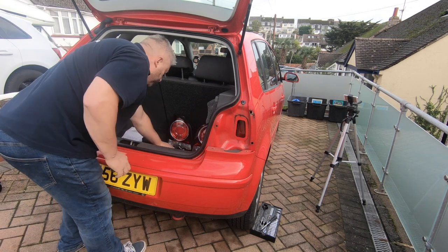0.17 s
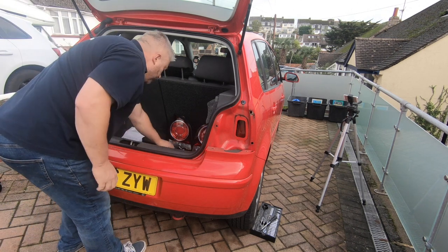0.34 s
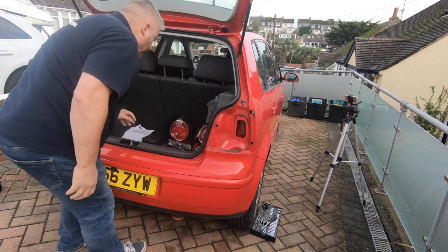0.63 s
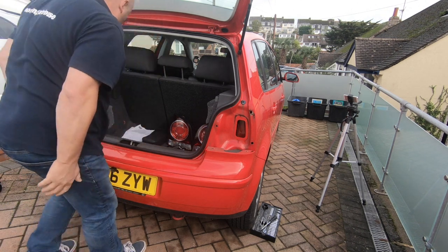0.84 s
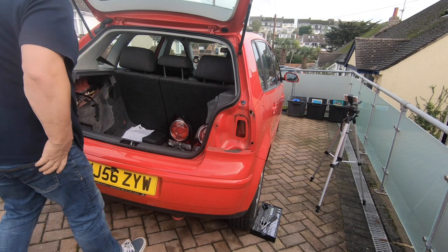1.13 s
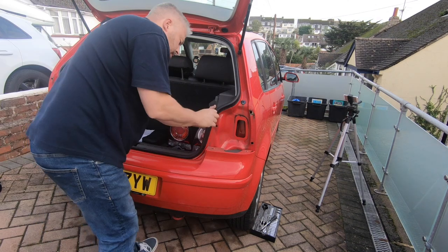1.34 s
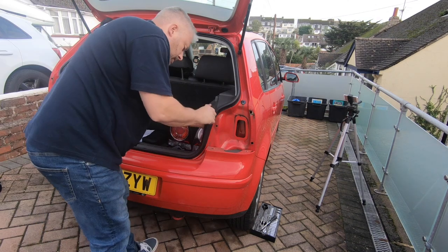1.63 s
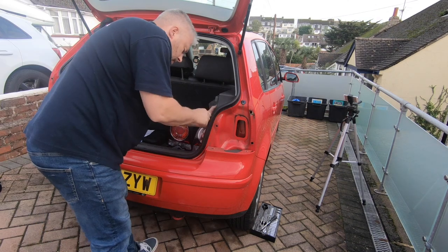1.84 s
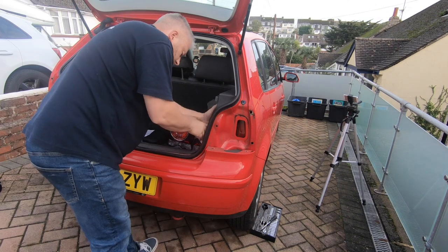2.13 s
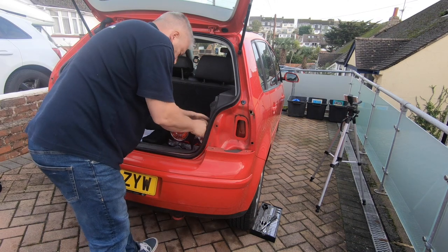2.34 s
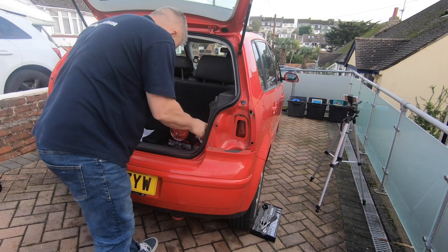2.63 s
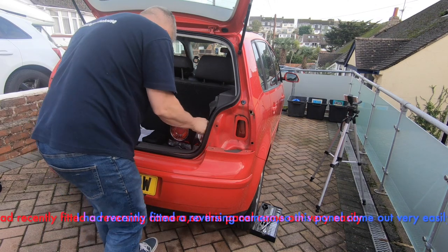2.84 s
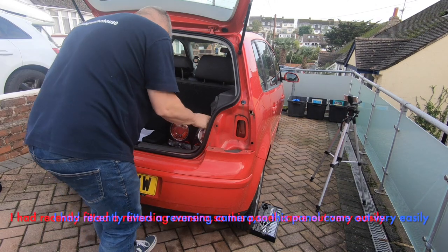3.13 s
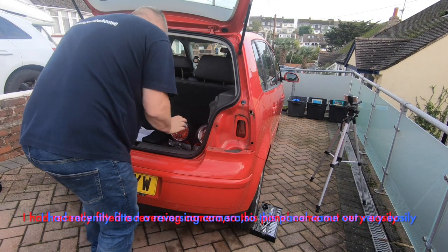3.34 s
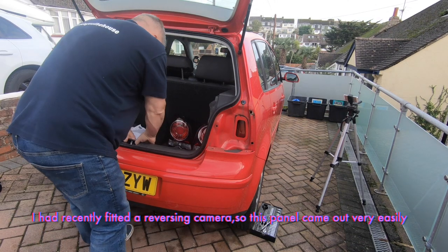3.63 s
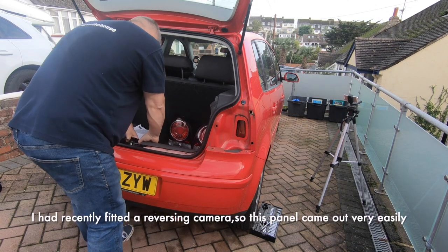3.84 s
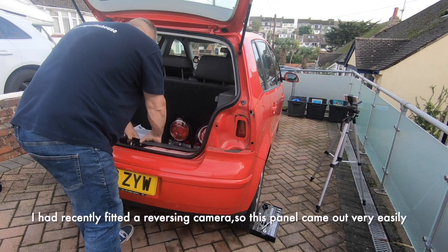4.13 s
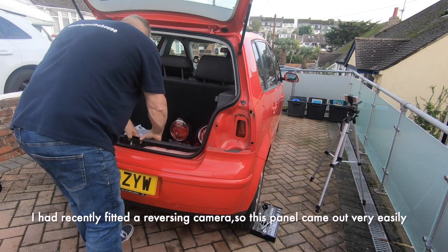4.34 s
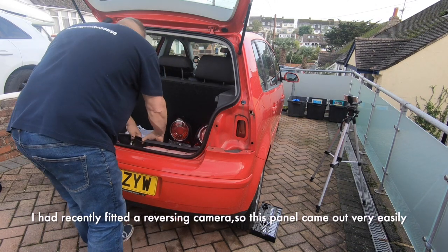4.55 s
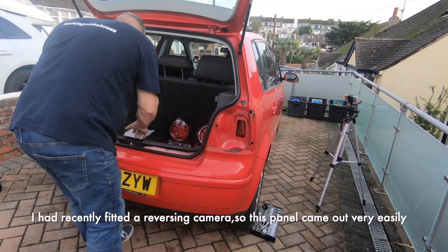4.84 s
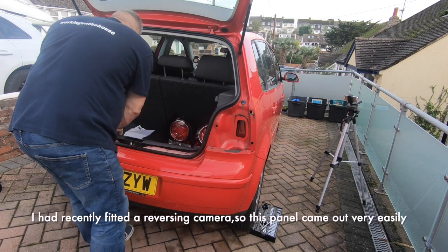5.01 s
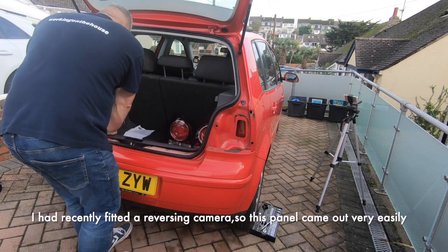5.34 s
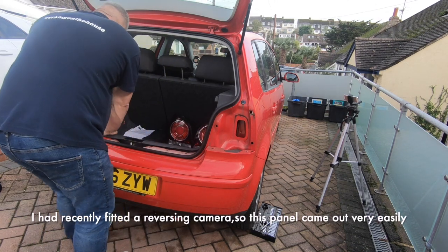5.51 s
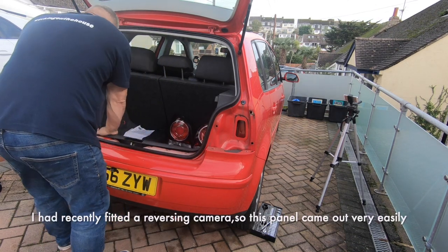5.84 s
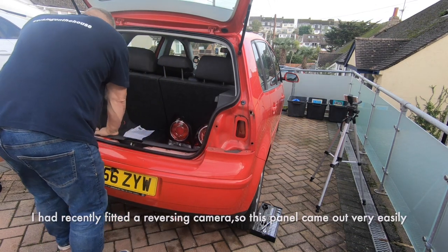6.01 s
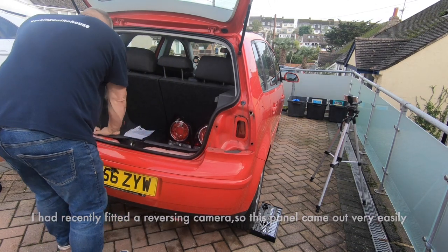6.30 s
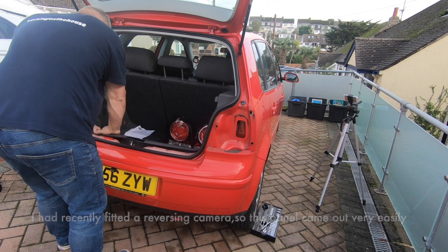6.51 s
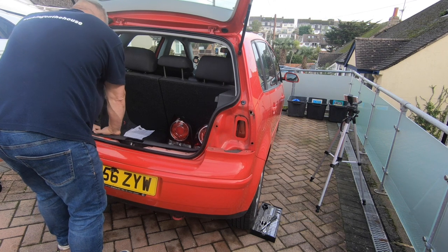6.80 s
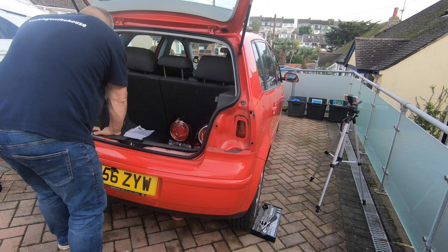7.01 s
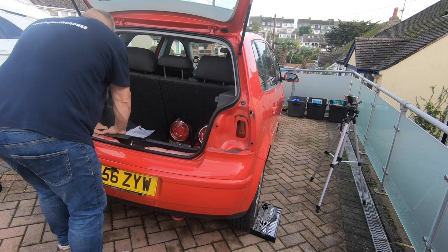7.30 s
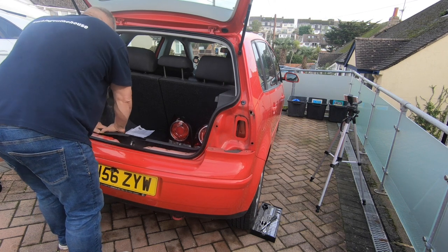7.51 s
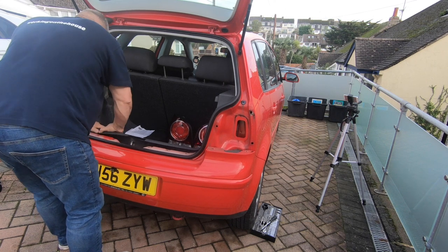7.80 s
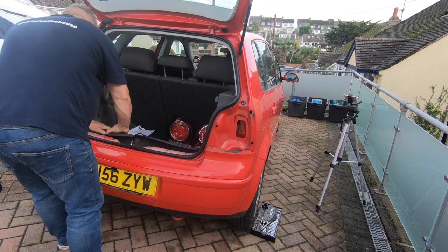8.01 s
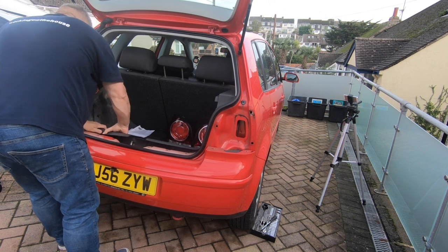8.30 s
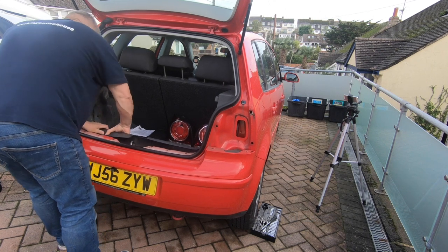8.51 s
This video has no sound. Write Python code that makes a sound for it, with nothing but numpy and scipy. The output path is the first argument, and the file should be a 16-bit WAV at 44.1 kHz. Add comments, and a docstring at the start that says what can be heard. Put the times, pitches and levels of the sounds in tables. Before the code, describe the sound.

A plastic panel is pried in the open boot of a car. Soft cloth rubbing leads to a short burst of snap and dull body thuds, then scattered scuffs and a resonant plastic knock. A lull gives way to the strongest clusters of crisp clip pops and boomy bumps, with one tiny bright tick between. The nearby stereo pickup is fairly dry, with distant town hum and gentle wind rumble.

```python
"""Trim panel worked loose in a car boot

A plastic trim panel is worked loose in the open boot of a parked car. Clips snap, plastic scuffs and
the panel bumps the hollow body: bursts of tiny contacts drive decaying modes and noisy knocks and cracks.
Hands and cloth rub in between, over town hum and light wind on the microphones: shaped, flickering noise.
Sparse reflections follow each hit, and wind puffs press the microphones as short low-pitched swings.
"""
import sys
import numpy as np
from scipy import signal
from scipy.fft import rfft, irfft
from scipy.io import wavfile
from scipy.ndimage import uniform_filter1d

SR = 44100
rng = np.random.default_rng(int(sys.argv[2]) if len(sys.argv) > 2 else 0)


def persist_wave(psi):
    """Save psi, clipped to +-1, as 16-bit WAV."""
    counts = np.round(np.clip(psi, -1, 1) * 32767).astype(np.int16)
    wavfile.write(sys.argv[1], SR, np.atleast_2d(counts).T)


N = 381906  # samples in the scene
SIZE = 12288  # samples in one hit
HZ = np.fft.rfftfreq(SIZE, 1 / SR)
LEAD = .004  # s of silence before each burst, room for the ports' phase lead


def gain_of(db):
    """Amplitude factor of a level in dB."""
    return 10 ** (np.asarray(db) / 20)


def evened(x):
    """Scales a signal to an RMS of one."""
    return x / np.sqrt(np.mean(x ** 2) + 1e-20)


def read(points, hz):
    """Reads a curve of (f, value) points along a logarithmic pitch axis."""
    f, value = np.transpose(points)
    return np.interp(np.log(hz + 1), np.log(f + 1), value)


def add(mix, s, sound):
    """Lays a sound into the mix from second s, cut at the end of the scene."""
    part = mix[..., round(s * SR):][..., :sound.shape[-1]]
    part += sound[..., :part.shape[-1]]


def causal(db):
    """Minimum-phase frequency response for a dB curve: nothing sounds before the blow."""
    log_gain = np.log(gain_of(np.maximum(db, -100)))
    circle = np.concatenate([log_gain, log_gain[-2:0:-1]])
    return np.exp(np.conj(signal.hilbert(circle)))[:len(db)]


def rings(modes, weights):
    """Frequency response of exponentially decaying modes, each with its weight."""
    t = np.arange(SIZE) / SR
    hz, db, t60 = np.transpose(modes)[:, :, None]
    decay = gain_of(db - 60 * t / np.clip(t60, .005, .25))
    return rfft(weights @ (decay * np.sin(2 * np.pi * hz * t)))


def burst(t60, rise, clumpy_db, first_db=-57.0, lumpy_db=0.):
    """Tiny uneven contacts in lumps, with a brief first blow, swell and die away; a twin has other signs."""
    t = np.arange(SIZE) / SR - LEAD
    sizes = gain_of(clumpy_db * np.minimum(rng.exponential(1, SIZE), 5)) * rng.choice([-1, 1], (2, SIZE))
    lumps = gain_of(lumpy_db * np.repeat(rng.standard_normal(SIZE // 96), 96))
    rattle = lumps * gain_of(-60 * t / np.clip(t60, .005, .4))
    first_blow = gain_of(first_db - 60 * np.maximum(t, 0) / 0.0087)
    swell = np.clip(t / rise, 0, 1) ** 2
    return rfft(swell * (rattle + first_blow) * sizes * (t < .2))


def ports(table, hz, first, second):
    """Spreads a spectrum over both ports; an unrelated twin makes up the share that is not alike."""
    db, phase, same = (read([(row[0], row[k]) for row in table], hz) for k in (1, 2, 3))
    port = gain_of(db / 2) * np.exp(.5j * phase)
    other = same * first + np.sqrt(1 - same ** 2) * second
    return np.array([port * first, other / port])


# The two microphone ports as heard from the boot:
# (f/Hz, left-right level/dB, left lead/rad, likeness 0-1)
NEAR_PORTS = [(100, -4, 0, 1), (250, -5.5, .2, 1), (450, -4.5, .8, .9), (680, -4, 1.7, .5),
              (1000, 0, 1.7, .9), (2000, 5, 1.2, .7), (2450, 6, 1, .4), (3000, 0, .2, .6),
              (4400, -3, .5, .8), (5200, -10, .8, .6), (6000, -11, 2, .25), (7000, -5, 3, .1),
              (8200, 2, 4, .15), (12000, 0, 6, .1)]


def peaked(spectra, db, span):
    """Sound at both ports, its envelope over span samples peaking at the given level."""
    x = irfft(ports(NEAR_PORTS, HZ, *spectra))
    peak = np.sqrt(2 * uniform_filter1d(x.mean(0) ** 2, span).max() + 1e-20)
    return gain_of(db) * x / peak


def wash(colour, curve_db, table, size, patchy_db, flicker_db):
    """Two-channel noise with drifting patches and a flicker shared by all frequencies."""
    hop = size // 4
    frames, hz = N // hop + 5, np.fft.rfftfreq(size, 1 / SR)
    a, b, c, d, patches = rng.standard_normal((5, frames, len(hz)))
    patches = evened(uniform_filter1d(uniform_filter1d(patches, 9, 0), 9, 1))
    flicker = evened(uniform_filter1d(rng.standard_normal(frames), 3))[:, None]
    level_db = read(colour, hz) + patchy_db * patches + flicker_db * flicker
    z = ports(table, hz, a + 1j * b, c + 1j * d) * gain_of(level_db)
    x = signal.istft(z, nperseg=size, noverlap=size - hop, time_axis=1, freq_axis=2)[1][:, :N]
    return gain_of(curve_db) * x / x.mean(0).std()


# The ports as heard from all around: (f/Hz, left-right level/dB, left lead/rad, likeness 0-1)
FAR_PORTS = [(60, -1, 0, .85), (150, -1, .4, .35), (300, -2, 1.5, .1), (450, 0, 3, .55),
             (750, -1, 3.1, .75), (1300, 0, 2.6, .5), (2450, 0, 1.9, .3), (3600, 0, .5, .55),
             (5200, -4, 0, .3), (6000, -6, .4, .1), (8000, 0, 0, 0)]
# Colour of the town hum: (f/Hz, relative level/dB per Hz)
TOWN_COLOUR = [(35, -37), (60, 1.5), (109, -12.5), (204, -5), (591, -22.5), (648, -15), (816, -10.5),
               (895, -18.5), (1670, -23), (3500, -40), (5950, -34.5), (8230, -39.5), (12500, -43.5),
               (14000, -47), (15000, -73)]


def town():
    """Steady broadband hum, strongest in the bass, that flickers slightly."""
    return wash(TOWN_COLOUR, -63, FAR_PORTS, size=1024, patchy_db=2.5, flicker_db=-1.2)


# Course of the wind: (t/s, level/dB)
WIND = [(0, -50), (.35, -59.5), (.6, -54.5), (1.2, -60.5), (1.5, -51), (1.85, -54), (2.0, -36),
        (2.32, -43.5), (2.42, -54), (2.58, -40.5), (3.0, -46), (3.15, -62), (3.55, -49.5), (4.1, -62),
        (4.6, -56.5), (5.5, -64.5), (6.4, -50), (7.25, -56), (7.85, -62.5), (8.66, -38.5)]
# Colour of the wind, nearly all bass: (f/Hz, relative level/dB per Hz)
GUST_COLOUR = [(7.1, -36), (12, -12), (32, 18.5), (52, 1.5), (113, -12), (223, -11), (260, -31.5),
               (340, -41), (570, -120)]


def wind(t):
    """Light wind on the microphones: a low rumble of noise that swells and sinks."""
    level_db = np.interp(t, *np.transpose(WIND))
    return wash(GUST_COLOUR, level_db, FAR_PORTS, size=2048, patchy_db=3.0, flicker_db=1.8)


# Rubbing of hands and cloth: (t/s, rustle level/dB, low shuffle level/dB)
RUB = [(0, -75.5, -63), (.65, -73.5, -59.5), (1.08, -68, -68), (1.4, -69.5, -56.5), (2.05, -65.5, -55),
       (2.77, -69, -64.5), (3.0, -65.5, -57.5), (3.4, -66.5, -53.5), (3.85, -65.5, -54),
       (4.08, -68.5, -56.5), (4.3, -63.5, -50.5), (4.7, -69, -53), (4.85, -72, -88), (5.05, -70, -65.5),
       (6.3, -65, -57.5), (7.5, -68.5, -60.5), (7.85, -72.5, -53.5), (8.66, -69, -87)]
# Colour of the rustle: (f/Hz, relative level/dB per Hz)
RUSTLE_COLOUR = [(410, -60), (700, 10.5), (1310, 9), (1720, 5), (3800, -9.5), (4210, -10.5), (6040, -7),
                 (7900, -21.5), (13500, -31), (15000, -37)]
# Colour of the low shuffle: (f/Hz, relative level/dB per Hz)
SHUFFLE_COLOUR = [(59, -51), (100, -24), (166, 1), (237, -12.5), (297, -16.5), (334, -16.5), (600, -31.5),
                  (780, -79), (1320, -120)]


def rubbing(t):
    """Friction of hands and cloth: a rustle of noise over a low shuffle, each with its own course."""
    s, rustle_db, shuffle_db = np.transpose(RUB)
    rustle = wash(RUSTLE_COLOUR, np.interp(t, s, rustle_db), FAR_PORTS,
                  size=256, patchy_db=0.5, flicker_db=-1.5)
    shuffle = wash(SHUFFLE_COLOUR, np.interp(t, s, shuffle_db), NEAR_PORTS,
                   size=1024, patchy_db=2.5, flicker_db=0.0)
    return rustle + shuffle


# Bright swishes of clothing: (t/s of the crest, level/dB, rise/s, fade/s)
SWISHES = [(.96, -67.5, 0.087, 0.28), (2.2, -73, 0.26, 0.32)]
# Colour of a swish: (f/Hz, relative level/dB per Hz)
SWISH_COLOUR = [(1760, -34), (3000, -3.5), (4370, -7), (6030, 2.5), (7960, -10.5), (9890, -10.5),
                (14500, -34)]


def swishes(t):
    """Cloth sweeps past cloth: a thin hiss swells and fades."""
    swell = 0
    for s, db, rise, fade in SWISHES:
        swell = swell + gain_of(db) * np.exp(-np.where(t < s, ((t - s) / rise) ** 2, (t - s) / fade))
    return swell * wash(SWISH_COLOUR, 0, FAR_PORTS, size=256, patchy_db=1.5, flicker_db=-0.5)


# Bumps on the body: (t/s of the full push, level/dB, strongest f/Hz, push t60/s, held to 0.4 at most)
BUMPS = [(0.921, -47, 177, 0.47), (1.047, -45.5, 169, 0.29), (1.374, -42, 71, 0.084),
         (1.507, -34, 221, 0.37), (1.531, -27.5, 118.4, 0.11), (1.564, -45, 64.6, 0.06),
         (1.857, -38.5, 252, 0.08), (1.867, -37, 156, 0.23), (1.899, -25, 91, 0.07),
         (1.988, -34.5, 67, 0.23), (2.07, -35, 53.7, 0.44), (2.199, -40, 54, 0.46),
         (2.491, -34.5, 145, 0.064), (3.212, -40, 184, 0.12), (3.238, -40.5, 188, 0.18),
         (3.602, -34.5, 263, 0.064), (3.658, -44.5, 356, 0.18), (3.752, -33, 122, 0.11),
         (3.772, -27, 148.6, 0.048), (3.79, -42, 127, 0.13), (3.809, -33.5, 183, 0.076),
         (4.189, -34.5, 209, 0.33), (4.312, -37, 258, 0.045), (4.384, -30, 201, 0.3),
         (4.428, -30, 100, 0.063), (4.61, -50, 310, 0.16), (4.698, -49.5, 230, 0.36),
         (4.745, -55, 330, 0.076), (5.166, -46, 171, 0.53), (6.259, -29, 203, 0.076),
         (6.268, -31.5, 198, 0.07), (6.28, -24.5, 99.4, 0.15), (6.496, -18.5, 185, 0.075),
         (6.506, -19.5, 193, 0.055), (6.52, -18.5, 170, 0.034), (6.541, -29, 120, 0.19),
         (6.556, -26.5, 163, 0.19), (6.576, -33.5, 82, 0.13), (6.68, -41, 184, 0.061),
         (7.113, -27, 194, 0.1), (7.125, -24, 165, 0.084), (7.147, -20, 90.5, 0.19), (7.16, -24, 201, 0.11),
         (7.176, -29, 99, 0.16), (7.198, -26.5, 210, 0.05), (7.207, -26, 70, 0.091),
         (7.502, -46.5, 188, 0.17), (7.68, -30, 171, 0.085), (7.696, -19.5, 120, 0.064),
         (7.722, -34, 270, 0.073), (7.719, -24, 119, 0.12), (7.874, -33.5, 161, 0.18),
         (8.034, -43.5, 147, 0.22), (8.231, -44, 169, 0.2), (8.414, -32, 109, 0.19),
         (8.606, -37, 78, 0.067)]
# Modes of the hollow body: (f/Hz, relative level/dB, t60/s)
BODY = [(54.7, -8, 0.13), (74.4, -8, 0.18), (88.9, -4, 0.19), (126, -3, 0.089), (151.4, -7, 0.053),
        (169, 1, 0.075), (213, 1.5, 0.074), (286.7, 4, 0.13), (334, -2, 0.11), (413, 4, 0.16),
        (474, -21, 0.064)]


def bumps(rise):
    """A soft push drives the hollow body; modes near the bump's pitch answer most."""
    out, body_hz = np.zeros((2, N)), np.transpose(BODY)[0]
    for s, db, hz, t60 in BUMPS:
        soft = causal(-9. * np.log2(np.maximum(HZ / (3.3 * hz), 1)))  # a soft push has little treble
        octaves = np.log2(body_hz / hz)
        near_db = np.minimum(20.2 * octaves, -30. * octaves)  # modes above the pitch fall off faster
        near = gain_of(near_db) * rng.choice([-1, 1], len(BODY))
        push = burst(t60, rise, clumpy_db=2.0, first_db=12.5)
        add(out, s - LEAD - rise, peaked(push * soft * rings(BODY, near), db, span=600))
    return out


# Modes of the plastic panel: (f/Hz, relative level/dB, t60/s)
PANEL = [(480, -7, .05), (567, -9, .06), (660, -10, .05), (776, 0, .035), (1043, -11, .046),
         (1223, -2, .05), (1417, -14, .05), (1576, -8, .06), (1819, -9, .045), (1925, -7, .04),
         (2043, -9, .04), (2170, -13, .04), (2300, -14, .04), (2420, -16, .04), (2700, -20, .03),
         (3300, -17, .03), (3700, -21, .025), (4250, -20, .025)]
# Where the panel is held and struck: (from t/s, relative ring level/dB, two favoured pitches f/Hz, f/Hz)
SPOTS = [(0, -6, 1043, 2420), (3., 0, 1223, 2060), (4.05, 10, 1223, 1240), (4.15, 2.5, 1043, 1660),
         (4.35, 1, 776, 2230), (4.9, -8, 776, 1925), (6.45, 2.5, 776, 1900), (7., -1.5, 720, 2060),
         (7.6, -2, 1223, 1880)]
# Colour of the dry knock: (f/Hz, relative level/dB per Hz)
KNOCK_COLOUR = [(210, -16), (350, 7), (559, -1.5), (780, 0.5), (960, -1.5), (1250, -2), (1500, -3.5),
                (1990, -6), (2860, -18), (4200, -23.5), (5460, -43.5), (9240, -120)]
# Colour of the crack: (f/Hz, relative level/dB per Hz)
CRACK_COLOUR = [(1650, -27.5), (2700, -8), (3270, -2.5), (3930, -3), (5650, 3), (7210, -5), (9000, -8.5),
                (9980, -7.5), (14100, -31), (16400, -42)]
FAVOUR_DB, FAVOUR_OCTAVES = 6.5, 0.23  # lift of the modes near a spot's pitches, and its reach
SPOT_DB = 2.2  # chance change of the modes from blow to blow
BANDS_DB = 4  # each crack has its own uneven bands, a few hundred Hz wide
CRACK_TILT_DB = 0.5  # dB per octave at a crack level of -56.5 dB
HARDER_BRIGHTER = 0.15  # growth of that tilt per dB of crack level


def panel_body(s, tilt_db, knock):
    """The panel's modes, as the spot held at second s favours them, ring over a dry knock."""
    _, ring_db, *pitches = [row for row in SPOTS if row[0] <= s][-1]
    octaves = np.log2(np.transpose(PANEL)[0][:, None] / pitches) / FAVOUR_OCTAVES
    favour_db = ring_db + FAVOUR_DB * np.exp(-octaves ** 2).max(1)
    chance_db = SPOT_DB * rng.standard_normal(len(PANEL))
    spot = gain_of(favour_db + chance_db) * rng.choice([-1, 1], len(PANEL))
    tilt = causal(tilt_db * np.log2(np.clip(HZ, 300, 3500) / 1200))
    return (knock + gain_of(-42.0) * rings(PANEL, spot)) * tilt


def crack_edge(crack_db, crack):
    """The bright edge of a blow, brighter when harder."""
    tilt_db = CRACK_TILT_DB + HARDER_BRIGHTER * (crack_db + 56.5)
    bands_db = BANDS_DB * np.interp(HZ, np.arange(0, 22400, 400), rng.standard_normal(56))
    return crack * causal(bands_db + tilt_db * np.log2(np.clip(HZ, 2500, 16000) / 6000))


def panel(events, rise_s, swell, **contact):
    """Each burst of contacts drives both the panel's body and its crack, each at its own level."""
    out = np.zeros((2, N))
    knock, crack = causal(read(KNOCK_COLOUR, HZ)), causal(read(CRACK_COLOUR, HZ))
    for s, panel_db, crack_db, t60, tilt_db in events:
        body, edge = panel_body(s, tilt_db, knock), crack_edge(crack_db, crack)
        rise = rise_s + swell * t60
        contacts = burst(t60, rise, **contact)
        hit = peaked(contacts * body, panel_db, span=120) + peaked(contacts * edge, crack_db, span=120)
        add(out, s - LEAD - .5 * rise, hit)
    return out


# Sharp snaps of clips: (t/s of mid-rise, panel level/dB, crack level/dB,
# rattle t60/s, held to 0.4 at most, panel tilt/dB per octave)
SNAPS = [(.924, -50, -76, 0.045, -5.5), (1.499, -36.5, -52, 0.047, 0.5), (1.505, -33, -41.5, 0.033, 4),
         (1.511, -34, -44, 0.12, -2), (3.143, -49.5, -66, 0.19, -1.5), (3.2015, -43.5, -55, 0.069, -2),
         (3.624, -53, -68, .05, 12), (3.664, -50.5, -73, 0.077, 12), (3.752, -45, -54, 0.12, 7),
         (3.767, -40, -51.5, 0.068, 7.5), (3.773, -40.5, -53.5, 0.11, 2), (4.183, -35.5, -61.5, 0.079, -5),
         (4.378, -28, -47, 0.066, 0), (4.387, -23.5, -54, 0.076, -6.5), (4.394, -41.5, -51.5, 0.24, -3),
         (4.705, -48, -82, 0.092, -5.5), (5.172, -47, -55, 0.074, -6), (5.216, -53, -71, 0.038, 0),
         (6.254, -43.5, -49.5, 0.042, -4), (6.26, -33, -72, 0.072, -5.5), (6.4905, -27.5, -60, 0.044, 3),
         (6.4935, -23.5, -41.5, 0.031, 3.5), (6.502, -26, -43.5, 0.059, 1), (6.51, -32, -47, 0.051, 5),
         (6.5165, -26.5, -33.5, 0.047, 3.5), (6.525, -28.5, -39.5, 0.053, -1.5),
         (6.537, -35.5, -42, 0.1, -1.5), (6.673, -45, -60, 0.07, 2), (7.11, -44, -42, 0.1, -7),
         (7.12, -29, -38, 0.039, 1.5), (7.1235, -28, -40, 0.045, 3.5), (7.131, -29.5, -40, 0.086, -3.5),
         (7.1462, -23, -28.5, 0.017, 4), (7.151, -34, -28.5, 0.027, 9), (7.158, -34, -38, 0.05, -0.5),
         (7.182, -44, -46, .05, 3), (7.176, -34, -46, 0.061, -2), (7.502, -57, -59, 0.15, 4),
         (7.679, -41.5, -57, 0.48, -1.5), (7.706, -41, -33.5, 0.043, -0.5), (7.709, -33, -31.5, 0.035, 1.5),
         (7.717, -43, -38, 0.076, -1.5), (7.733, -52, -43, 0.092, -2)]


def snaps():
    """Clips let go: a sharp blow and a short rattle strike the panel."""
    return panel(SNAPS, rise_s=.0008, swell=0, clumpy_db=3.0, first_db=-10.5, lumpy_db=1.5)


# How fast the reflections die in each band: (f/Hz, t60/s)
BOOT = [(100, 0.37), (500, 0.34), (2000, 0.19), (6000, 0.32), (14000, 0.25)]


def boot(x):
    """Sparse reflections of random sign from boot, car and walls, each band dying at its own speed."""
    taps = np.zeros((2, SR // 2))
    at = np.arange(160, SR // 2 - 20, 20) + rng.integers(0, 20, (2, (SR // 2 - 161) // 20))
    np.put_along_axis(taps, at, rng.choice([-1., 1.], at.shape), 1)
    hz, t, z = signal.stft(taps, SR, nperseg=256)
    decay = gain_of(-60 * t / np.maximum(read(BOOT, hz), .02)[:, None])
    tail = signal.istft(z * decay, SR, nperseg=256)[1]
    return signal.fftconvolve(x, tail / np.linalg.norm(tail[0]), axes=1)[:, :N]


# Single puffs of wind, each starting 10 ms before t: (t/s, level/dB before a small chance change, f/Hz)
BUFFETS = [(1.302, -43, 45.5), (1.787, -41.5, 33.4), (2.019, -47, 24), (2.492, -33, 63.4), (2.541, -30, 85),
           (2.604, -35, 40), (2.677, -45, 44.4), (2.952, -38.5, 21.5), (3.5, -37, 25.4), (4.406, -43, 24.6),
           (5.083, -37.5, 27.2), (6.254, -33, 69), (6.587, -40, 71.5), (6.773, -42, 27.4),
           (7.299, -44, 22.1), (7.676, -56, 70), (7.798, -35, 21.8), (8.139, -35.5, 22.3),
           (8.189, -37.5, 26.8), (8.39, -45, 29.6), (8.577, -53, 31)]


def buffets(turns):
    """A puff presses both microphones for a cycle or two."""
    out = np.zeros((2, N))
    for s, db, hz in BUFFETS:
        u = np.arange(0, turns, hz / SR)  # cycles since the puff began
        phase = rng.random() + 0.075 * rng.standard_normal((2, 1))
        puff = np.sin(np.pi * u / turns) ** 2 * np.cos(2 * np.pi * (u + phase))
        add(out, max(s - .01, 0), gain_of(db + 0.62 * rng.standard_normal((2, 1))) * puff)
    return out


# Soft scuffs: (t/s of mid-rise, panel level/dB, crack level/dB, rattle t60/s, held to 0.4 at most)
SCUFFS = [(1.539, -50, -65, 0.28), (1.835, -46.5, -54.5, 0.26), (1.853, -42.5, -59, 0.15),
          (1.882, -54, -62.5, 0.08), (2.863, -53, -63, 0.12), (3.172, -50, -56.5, 0.15),
          (3.59, -47, -60, 0.14), (3.622, -49, -59.5, 0.29), (3.642, -56, -74, 0.31),
          (3.664, -51, -67, 0.21), (3.683, -59, -66, 0.064), (3.799, -47, -61, 0.24),
          (4.078, -54.5, -76, .2), (4.31, -59, -70, 0.11), (4.418, -43.5, -60, 0.2), (4.44, -44, -55.5, .2),
          (4.462, -47, -58, 0.14), (4.668, -64, -66.5, 0.066), (4.975, -58, -60, 0.33),
          (5.161, -53, -55, 0.33), (5.2, -58, -61, 0.17), (5.645, -57.5, -59.5, 0.32),
          (6.214, -47.5, -59, .3), (6.545, -44.5, -60, 0.21), (6.615, -46, -63, 0.21),
          (6.68, -51, -57.5, 0.16), (6.799, -70, -63, 0.46), (7.107, -31, -48.5, 0.058),
          (7.168, -38.5, -47, 0.16), (7.745, -56, -65, 0.12), (7.84, -50, -55, 0.29),
          (7.871, -39, -52, .06), (8.032, -62, -68, 0.22), (8.427, -57.5, -70, .16)]


def scuffs():
    """Plastic slides on plastic: softly swelling contacts without a hard first blow."""
    tilted = [(*row, -1.5) for row in SCUFFS]  # panel tilt in dB per octave
    # the swell lasts 8 ms plus a tenth of the listed t60
    return panel(tilted, rise_s=.008, swell=.1, clumpy_db=3.5, lumpy_db=3)


# Ticks of a small loose clip: (t/s, level/dB, rattle t60/s)
TICK = [(6.9327, -42, 0.13)]
CLIP = [(5600, 6.9, .008), (5800, 27, 0.0097), (6040, 19, 0.0085), (6500, 6.3, .007)]


def tick():
    """A short bright rattle of one small clip: a hard blow and fine contacts ring its modes."""
    out = np.zeros((2, N))
    for s, db, t60 in TICK:
        contacts = burst(t60, 0.00047, clumpy_db=-7.0, first_db=17.0, lumpy_db=3.5)
        duller = causal(-9. * np.log2(np.maximum(HZ / 7000, 1)))
        ring = rings(CLIP, np.ones(len(CLIP))) * duller
        add(out, s - LEAD, peaked(contacts * ring, db, span=120))
    return out


def scene():
    """Hits with their reflections, over rubbing, swishes, wind and town."""
    t = np.arange(N) / SR
    hits = bumps(rise=0.00696) + snaps() + scuffs() + tick()
    background = town() + wind(t) + rubbing(t) + swishes(t) + buffets(turns=1.9)
    return hits + gain_of(-11.5) * boot(hits) + background


def record(dry):
    """The band limit of the recorder: a steep low-pass at 16.4 kHz."""
    low_pass = signal.firwin(511, 16400, window=("kaiser", 9), fs=SR)
    return signal.oaconvolve(dry, low_pass[None], "same")


dry = scene()
out = record(dry)
persist_wave(out)
```